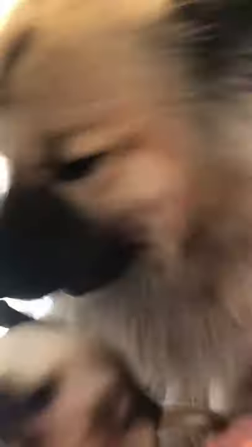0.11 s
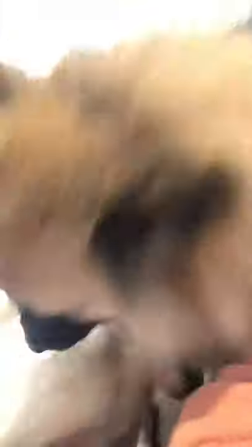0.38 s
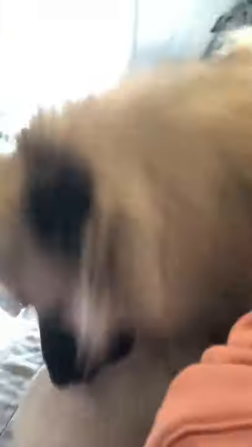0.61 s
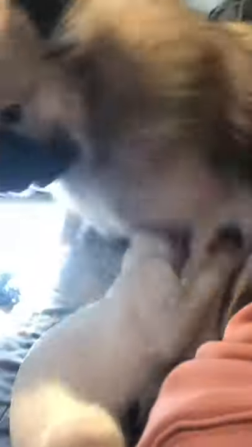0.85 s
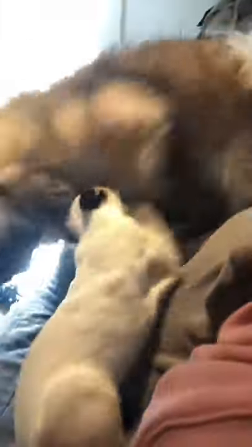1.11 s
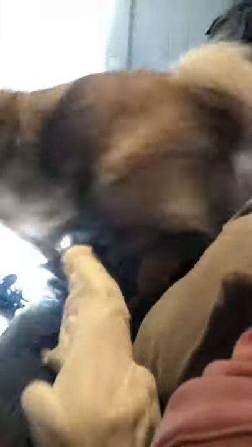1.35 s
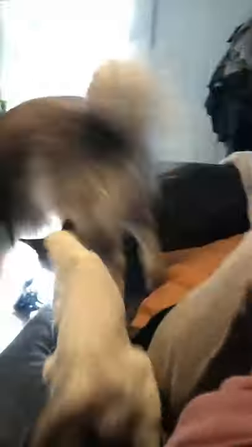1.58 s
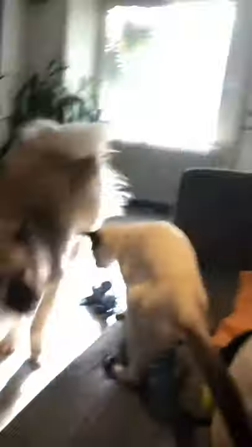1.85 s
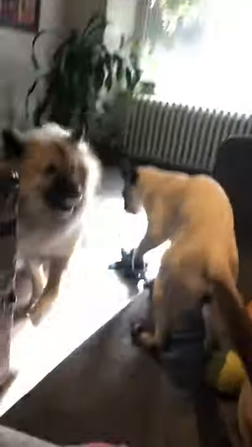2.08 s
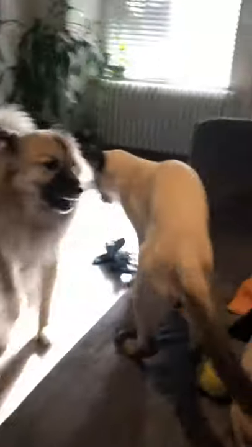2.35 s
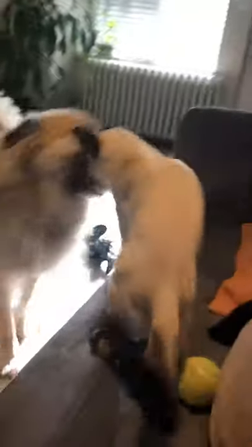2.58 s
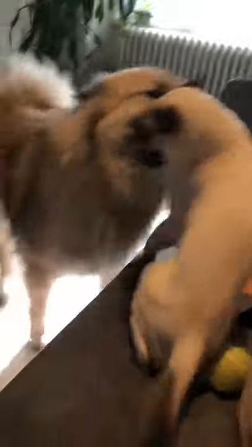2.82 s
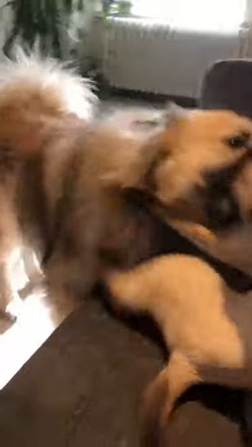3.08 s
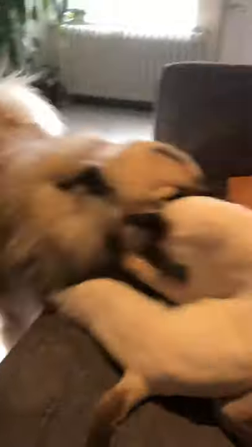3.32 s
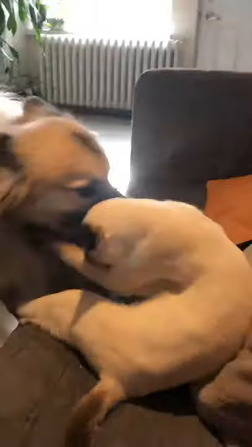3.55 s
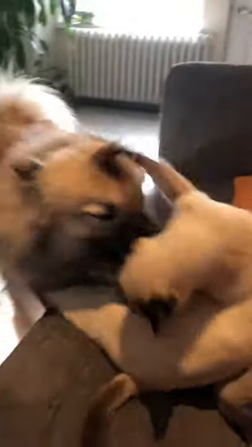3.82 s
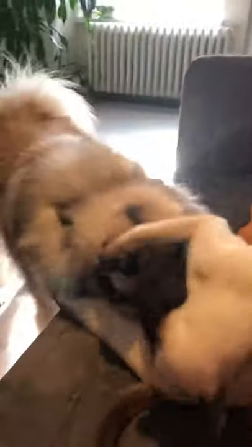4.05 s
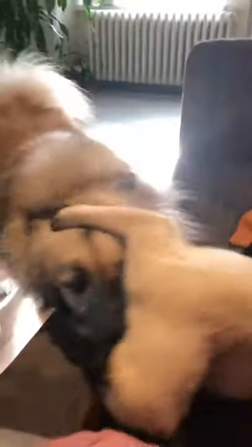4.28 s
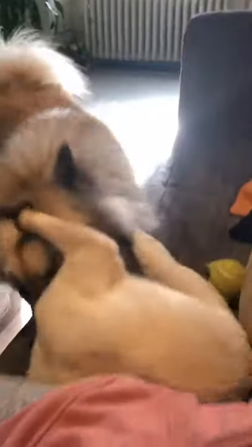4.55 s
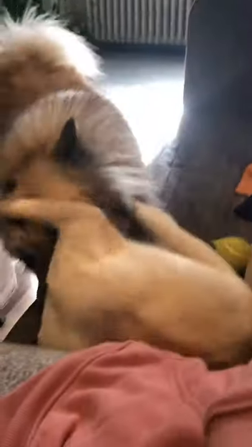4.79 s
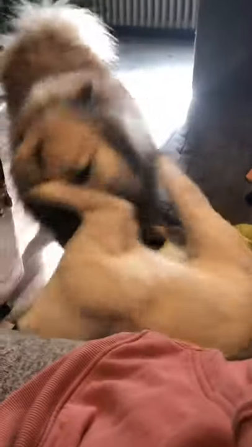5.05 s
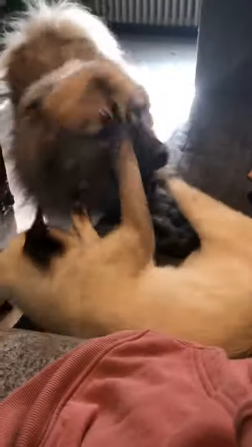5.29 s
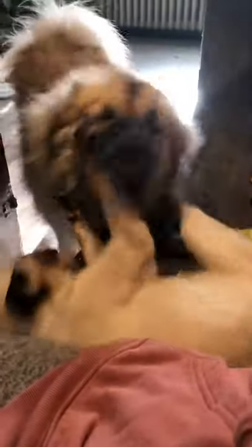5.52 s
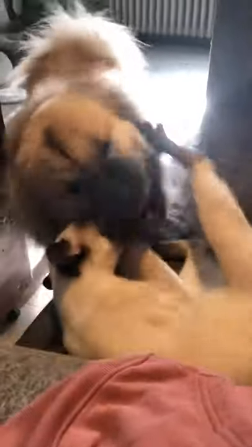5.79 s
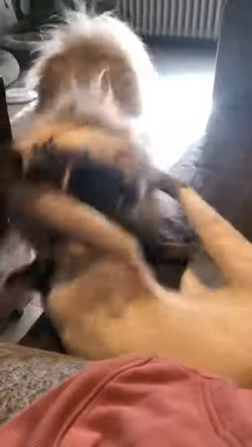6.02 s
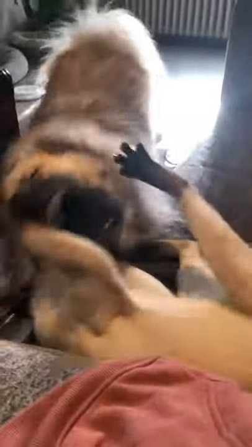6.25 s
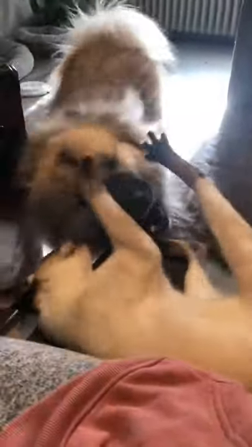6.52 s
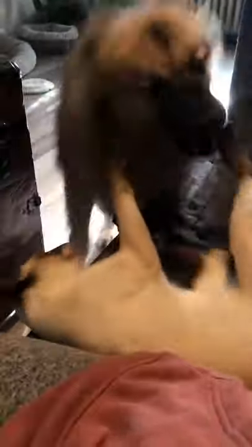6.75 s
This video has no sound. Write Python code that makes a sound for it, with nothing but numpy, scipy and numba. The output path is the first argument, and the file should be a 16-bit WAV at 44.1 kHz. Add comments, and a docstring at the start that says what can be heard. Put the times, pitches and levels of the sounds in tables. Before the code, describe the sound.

A large dog growls in rough, uneven bursts while wrestling on a couch, with dull paw thumps, claw scratches and brief pants in a living room.

```python
"""A large dog's uneven growl opens over faint low room noise, in bursts as it wrestles a cat on a couch.
Irregular slaps of its vocal folds and leaking air ring chest, mouth, tongue and throat, chopped by a flutter.
Paws thump, and a tooth or toy knocks, as soft pushes that ring two low modes; claws tick and skid on the
hard floor as short scratches and grainy noise, which also makes short hisses of breath in the late growls.
Pants are noise through mouth resonances. Feedback delays make the living room answer them all."""
import sys
import numpy as np
from scipy import signal
from scipy.fft import rfft, irfft, next_fast_len
from scipy.io import wavfile
from scipy.ndimage import uniform_filter1d
from numba import njit

SR = 44100
rng = np.random.default_rng(int(sys.argv[2]) if len(sys.argv) > 2 else 0)


def to_wav(s):
    """Save 16-bit WAV."""
    ch = np.atleast_2d(s).T  # columns
    pcm = np.round(np.clip(ch, -1, 1) * 32767)  # PCM
    wavfile.write(sys.argv[1], SR, pcm.astype(np.int16))


def boost(x):
    """Linear amplitude factor 10**(x/20) for a level x in decibels (scalar or array-like)."""
    u = np.asarray(x, float) / 20
    return 10 ** u


N = 303408


def rms_one(x):
    """Scales to rms 1."""
    return x / np.sqrt(np.mean(x ** 2) + 1e-20)


def in_time(rows):
    """Joins rows that start with a time in seconds into one curve per further column."""
    s, *columns = np.transpose(rows)
    return [np.interp(np.arange(N) / SR, s, column) for column in columns]


def smooth(x, hz):
    """One-pole low-pass."""
    r = np.exp(-2 * np.pi * hz / SR)
    return signal.lfilter([1 - r], [1, -r], x)


def band(x, low_hz, high_hz):
    """Keeps a resonance group out of its neighbours' range."""
    return signal.sosfilt(signal.butter(2, [low_hz, high_hz], "band", fs=SR, output="sos"), x)


def drift(hz):
    """Random wander, mostly slower than hz, with spread 1."""
    noise = rng.standard_normal(N + SR)
    return rms_one(smooth(smooth(noise, hz), hz)[SR:])


def evened(x, hz):
    """Divides out the level averaged over 1/hz seconds, above a small floor."""
    window = int(SR / hz)
    return x / np.sqrt(uniform_filter1d(x ** 2, window) + 0.00063 * np.mean(x ** 2))


def coloured(points):
    """Noise with a spectrum joined from (Hz, dB) points on a log-frequency axis; rms 1."""
    size = next_fast_len(N)
    hz = np.maximum(np.arange(size // 2 + 1) * SR / size, 1)
    point_hz, point_db = np.transpose(points)
    shape = boost(np.interp(np.log(hz), np.log(point_hz), point_db))
    return rms_one(irfft(rfft(rng.standard_normal(size)) * shape, size)[:N])


@njit
def moving(x, cosine, r):
    """Two-pole resonance whose centre may move; gain 1 on top."""
    y = np.zeros(len(x))
    for i in range(2, len(x)):
        y[i] = (1 - r * r) / 2 * (x[i] - x[i - 2]) + 2 * r * cosine[i] * y[i - 1] - r * r * y[i - 2]
    return y


def resonance(x, hz, width_hz):
    """Rings x at a fixed or moving frequency."""
    return moving(x, np.cos(2 * np.pi * hz / SR) * np.ones(len(x)), np.exp(-np.pi * width_hz / SR))


def tract(x, modes):
    """Parallel resonances (Hz, width Hz, dB) with alternating signs."""
    return sum((-1) ** k * boost(db) * resonance(x, hz, w) for k, (hz, w, db) in enumerate(modes))


def room_tone():
    """Steady coloured noise, strongest in the bass, whose level wanders slightly."""
    # Spectrum of the quiet room: pitch_hz, level_db (relative)
    tone_colour = [(18, -46), (30, 22), (161, 15.5), (702, 3.5), (1810, -5), (3400, -12), (4910, -15),
                   (6720, -18), (7670, -21), (8740, -21.5), (16000, -26.5)]
    tone_db = -51.5
    return boost(tone_db + 0.5 * drift(4.4)) * coloured(tone_colour)


def with_silence(bursts):
    """Chains the growls; the level falls to -90 dB between them."""
    rows = []
    for burst in bursts:
        (first_s, _, first_opening), (last_s, _, last_opening) = burst[0], burst[-1]
        rows += [(first_s - .004, -90, first_opening), *burst, (last_s + .03, -90, last_opening)]
    return rows


def fold_slaps(rate, rough):
    """Each fold cycle slaps once, uneven in time and strength; loose tissue knocks at random between."""
    knocks_per_slap, rattle_gain = 3, 2.4
    wobble = rough * (.6 * drift(80) + .3 * drift(20))
    cycle = (np.cumsum(rate * np.exp(wobble)) / SR).astype(int)
    strength = boost(rough * (8.5 * rng.standard_normal(N)[cycle] + 3.5 * drift(50)))
    knocks = (rng.random(N) < knocks_per_slap * rate / SR) * rng.standard_normal(N)
    slaps = -np.diff(cycle, prepend=0) * strength
    return rattle_gain * rough ** 1.5 * knocks + slaps + 1e-18


def leaking_air(slaps, rough):
    """Air leaks steadily through the folds and rushes through after each slap."""
    flow = rms_one(smooth(np.abs(slaps), 55.0))
    return (0.39 + 0.75 * flow) * (0.48 + 2 * rough) * rng.standard_normal(N)


def palate_flutter(rough):
    """The soft palate flaps and chops the sound, deeper when the folds are rough."""
    flutter_hz, depth_db_per_rough = 23, 8
    flap = np.sin(2 * np.pi * np.cumsum(flutter_hz * np.exp(.15 * drift(6))) / SR)
    return boost(depth_db_per_rough * rough * flap)


def throat_breath(slaps, stretch):
    """Breath noise pulses with the slaps and echoes along the throat tube."""
    # Spectrum of the breath: pitch_hz, level_db (relative)
    breath_colour = [(2240, -2), (3800, -17), (4750, 9.5), (5480, 16), (8720, 5.5), (9420, 6.5),
                     (12800, 2.5), (13800, 0.5), (16000, -5)]
    tube_hz = 612   # spacing of the high tube resonances at stretch 1
    air = coloured(breath_colour) * (.5 + rms_one(smooth(np.abs(slaps), 60)))
    n = np.arange(N)
    return sum((-.4) ** k * np.interp(n - k * SR / tube_hz / stretch, n, air) for k in range(4))


def hard_slaps(mouth_hz):
    """Single hard slaps stand out of the rattle: softened clicks ring the mouth twice over."""
    # Hard slaps of the folds: start_s, level_db (the strongest sets the peak of the whole layer)
    slap_hits = [(0.698, -22), (1.689, -35), (3.136, -31), (3.738, -24), (3.824, -20.5), (4.48, -41),
                 (4.811, -27), (5.011, -17), (5.037, -20.5), (5.067, -13), (5.105, -14), (5.165, -23),
                 (5.448, -26), (5.508, -13.5), (5.813, -21), (5.891, -13.5), (6.268, -18), (6.335, -16),
                 (6.431, -19.5), (6.498, -11), (6.637, -20)]
    soft_hz = 2200
    clicks = np.full(N, 1e-18)
    start_s, level_db = np.transpose(slap_hits)
    clicks[[round(s * SR) for s in start_s]] = boost(level_db)
    softened = smooth(smooth(clicks, soft_hz), soft_hz)
    knock = resonance(resonance(softened, mouth_hz, 260), mouth_hz, 600)
    return knock * clicks.max() / np.abs(knock).max()


def growl():
    """Uneven fold slaps, fluttered by loose throat tissue, ring chest, mouth, tongue and throat."""
    # Each growl burst: start_s, effort_db (chest level), opening_db (mouth opening setting)
    growl_bursts = [
        [(0.018, -34, -4.5), (0.028, -39.5, -5), (0.052, -34, -7), (0.13, -70, -30)],
        [(0.268, -43, 3), (0.278, -31, -19), (0.295, -29, -5), (0.312, -38, -20), (0.35, -53, -25),
         (0.37, -61, -16)],
        [(0.5, -56, -44), (0.52, -38, -3), (0.594, -38.5, -3.5), (0.616, -23.5, -7.5), (0.686, -32, -6),
         (0.708, -23, -9), (0.732, -34.5, -7), (0.978, -32, -4), (1.022, -38, -9.5), (1.054, -62, 3),
         (1.08, -62, -15)],
        [(1.16, -57, -7), (1.17, -37, -1), (1.21, -22.5, -14.5), (1.248, -30, 3.5), (1.428, -37.5, -8),
         (1.48, -57.5, -9)],
        [(1.665, -42, -11), (1.689, -30.5, 2), (1.711, -27, -3.5), (1.813, -32, -5.5), (1.833, -30.5, -0.5),
         (1.935, -42, 4.5), (1.955, -37, -8)],
        [(2.05, -53, 6), (2.164, -47.5, -0.5), (2.28, -38.5, -2.5), (2.492, -47.5, -4), (2.536, -40.5, -5),
         (2.628, -36.5, -7.5), (2.68, -59.5, 8.5)],
        [(2.96, -38, 0.5), (2.984, -33, -0.5), (3.094, -28, -4.5), (3.144, -30, -2.5), (3.28, -29.5, -10.5),
         (3.31, -35.5, -3), (3.412, -31, -12), (3.496, -42, -13), (3.522, -36.5, -14), (3.626, -40, -10),
         (3.698, -30.5, -5), (3.882, -33.5, -1.5), (3.894, -32, -7.5), (3.935, -44.5, 4)],
        [(4.475, -62, -24), (4.479, -42, 2), (4.511, -32, -4), (4.729, -34.5, -3.5), (4.923, -34, 5.5),
         (4.935, -25.5, -11), (4.951, -33, 2.5), (5.047, -35, 7), (5.081, -29, -3.5), (5.103, -32.5, 4.5),
         (5.145, -30, -5), (5.241, -33, -3.5), (5.437, -30, -5), (5.455, -27.5, 1.5), (5.631, -26, 3),
         (5.743, -31, -2), (5.857, -31.5, 3), (5.907, -25.5, -2.5), (5.98, -42, -7)],
        [(6.262, -60, 0), (6.268, -25.5, 0), (6.316, -30, 1), (6.342, -26.5, 4), (6.362, -31, -8),
         (6.508, -26.5, 4), (6.686, -29.5, 1.5), (6.738, -31, -2.5), (6.79, -33.5, 3), (6.822, -51, -5),
         (6.845, -61, -10)],
    ]
    # Voice setting: start_s, fold_rate_hz (before wobble), tongue_hz, upper_throat_hz (before wander),
    # lips_drawn (share drawn back, 0-1)
    voice = [(0, 86.1, 1100, 1680, 0.6), (.1, 80.43, 1100, 1690, 0.6), (.27, 118.1, 965, 1750, 0.38),
             (.37, 74.6, 1000, 1840, 0.1), (.5, 167.1, 930, 1610, 0.8), (.58, 135.2, 950, 1720, 0.47),
             (.68, 135.5, 970, 1500, 0.58), (.85, 137.1, 854, 1835, 0.61), (.97, 138.4, 880, 1576, 0.43),
             (1.04, 110.7, 895, 1600, 0.6), (1.16, 180.8, 1070, 1650, 0.35), (1.25, 179, 1040, 1700, 0.59),
             (1.4, 173.5, 1310, 1750, 0.57), (1.665, 135.7, 1092, 1490, 0.51),
             (1.76, 164.4, 1050, 1510, 0.59), (1.87, 154.2, 1180, 1670, 0.72),
             (1.95, 148.3, 1270, 1750, 0.79), (2.14, 89.25, 1043, 1797, 0.61),
             (2.38, 98.45, 1100, 1950, 0.59), (2.68, 95.57, 1270, 1800, 0.67),
             (2.96, 90.77, 1100, 1906, 0.26), (3.08, 140, 1210, 2160, 0.54),
             (3.16, 150.5, 1230, 2200, 0.46), (3.25, 129.8, 1225, 1758, 0.47),
             (3.42, 99.95, 1200, 1910, 0.5), (3.6, 90.26, 1110, 2132, 0.47),
             (3.74, 137.6, 1264, 2092, 0.46), (3.92, 125.2, 1430, 2320, 0.57),
             (4.475, 108.9, 1055, 1650, 0.23), (4.6, 119.5, 1355, 1720, 0.61),
             (4.78, 104.2, 1191, 1802, 0.44), (4.99, 125.4, 1100, 1871, 0.41),
             (5.13, 140.8, 1180, 2200, 0.54), (5.25, 104.9, 1032, 1900, 0.36),
             (5.41, 126.5, 1001, 1982, 0.5), (5.51, 157.2, 1100, 1840, 0.36),
             (5.68, 130.6, 1020, 1933, 0.38), (5.75, 107.1, 1043, 1905, 0.41),
             (5.84, 121.7, 1130, 2003, 0.52), (5.92, 148.7, 1190, 2200, 0.64),
             (6.26, 88.18, 1030, 2480, 0.39), (6.35, 121.9, 1100, 2382, 0.58), (6.4, 149, 1100, 1895, 0.48),
             (6.5, 149, 1131, 2010, 0.42), (6.64, 151.2, 1151, 2200, 0.59), (6.72, 125.4, 1250, 1630, 0.48),
             (6.8, 120, 1300, 1935, 0.76)]
    # Unevenness of the folds: start_s, roughness (0-1)
    roughness = [(0, .3), (1.15, .28), (1.6, .28), (1.68, .14), (1.8, .17), (1.9, .24), (2.1, .25),
                 (2.9, .25), (2.97, .18), (3.05, .26), (3.3, .3), (3.4, .3), (4.6, .3), (5.12, .3),
                 (5.2, .17), (5.3, .12), (5.47, .2), (5.7, .2), (5.85, .2), (5.95, .13), (6.26, .1),
                 (6.32, .16), (6.36, .26), (6.5, .32), (6.7, .3), (6.78, .15)]
    # Throat shape as jaw and head move: start_s, fourth_hz, fourth_db, fifth_hz, fifth_db
    # (levels against the upper throat resonance, before they wander)
    high_throat = [(0, 2530, -12, 3320, -2), (.55, 2290, -7, 3130, -18), (.65, 2330, -7, 3070, -17),
                   (.75, 2320, -1, 3120, -2), (.85, 2390, -14, 3400, -23), (.97, 2250, -4, 3310, -13),
                   (1.2, 2560, -1, 3120, -5), (1.42, 2399, -4, 3170, -12), (1.7, 2150, -3, 3430, -6),
                   (1.92, 2270, -5, 3550, -4), (2.3, 2601, -2, 3240, -5), (2.6, 2504, -7.5, 3620, -17),
                   (3, 2398, -9, 3350, -2), (3.1, 2510, -3, 3570, -11), (3.4, 2620, 5.5, 3780, -8),
                   (3.55, 2699, -10, 3450, -16), (3.7, 2816, -6, 3550, -10), (3.8, 3003, -3, 3400, -2),
                   (3.9, 2670, -1, 3550, 2), (4.5, 2509, -11, 3650, -4.5), (4.9, 2429, 0.5, 3180, -10),
                   (5.12, 2359, 7.5, 2913, 0), (5.25, 2552, -16, 3720, -2), (5.4, 2583, -18, 3400, -8),
                   (5.55, 2694, -5, 3220, -2), (5.66, 2800, -8, 3850, -11), (5.76, 2698, -23, 3950, -13),
                   (5.83, 2770, -8, 3202, -6), (5.9, 2399, 4, 3443, 2), (6.27, 2899, 5, 3620, 1),
                   (6.35, 2800, -9, 3400, -11), (6.42, 2699, -2, 3400, -13), (6.5, 2351, -8, 3390, -7),
                   (6.75, 2450, -15, 3400, -18), (6.79, 2790, 1.5, 3800, -13)]
    # Low throat: start_s, fold_tone_db, under_mouth_db (resonance below the mouth's), mouth_length (share)
    low_throat = [(0, 7, 7, 0.93), (.3, -11, 1, 0.86), (.55, 8, -12, 0.86), (.75, -9, 7, 1.26),
                  (.95, -9, -15, 0.95), (1.2, -19, 8, 1.1), (1.35, 4, 4, 0.98), (1.72, -25, 1, 1.22),
                  (1.9, 8, -4.5, 1.01), (2.3, -5, -7, 1), (2.6, 7, -4.5, 0.87), (3, -8, 8.5, 1.06),
                  (3.2, -11, -1, 1.11), (3.4, -3, 4, 1.23), (3.55, 2, -32, 1.045), (3.7, -3, -2.5, 1.17),
                  (3.88, -11.5, -5, 1.11), (4.55, 1, 1, 0.979), (4.95, -8, -2, 0.97), (5.3, -5, -4, 0.94),
                  (5.5, -11, 0.5, 0.95), (5.9, -1, -1, 0.97), (6.28, -2, -7.5, 1.015), (6.5, -9, -6.5, 0.9),
                  (6.7, -26, 2.5, 0.93), (6.79, -35, -14, 0.77)]
    # Lasting resonances: pitch_hz, width_hz, level_db; the first, under the mouth, shifts with the pharynx
    throat_modes = [(486.6, 129, -8.5), (4310, 510, -14)]
    # Groups against the effort: level_db at mid opening and lips, opening_share, lips_db per unit of lips
    mouth_gain, tongue_gain, upper_gain = (-9, 1.14, -10.5), (-14, 0.92, 10), (-18, 0.75, 37)
    mid_opening_db = -6
    pharynx_mid_hz, pharynx_share = 220.6, 0.59   # at a 140 Hz fold rate; share of its change followed
    mouth_mid_hz, mouth_hz_per_db = 821, -0.5   # at mid opening and mouth length 1

    chest_db, opening = in_time(with_silence(growl_bursts))
    rate, tongue_hz, third_hz, lips = in_time(voice)
    rough, = in_time(roughness)
    fourth_hz, fourth_db, fifth_hz, fifth_db = in_time(high_throat)
    tone_db, under_db, mouth_length = in_time(low_throat)
    opening = np.clip(opening - mid_opening_db, -20, 20)
    lips = lips - .5
    mouth_db, tongue_db, upper_db = (chest_db + db + share * opening + per_lips * lips
                                     for db, share, per_lips in (mouth_gain, tongue_gain, upper_gain))
    breath_db = -12.5 - 8 * lips + 0.84 * (chest_db + 29.0)   # harder growls push out more air
    pharynx_hz = pharynx_mid_hz + pharynx_share * (rate - 140)
    mouth_hz = (mouth_mid_hz + mouth_hz_per_db * opening) / mouth_length

    slaps = fold_slaps(rate, rough)
    puff = leaking_air(slaps, rough)
    soft = rms_one(smooth(smooth(slaps, 1300), 1300))   # wet folds close softly
    low_source = soft + 5 * rough * smooth(puff, 1500)
    high_source = rms_one(smooth(soft, 2700)) + 1.95 * smooth(puff, 1000)

    fold_tone = resonance(low_source, rate, 90) + 3.2 * rough * resonance(low_source, 0.68 * rate, 50)
    pharynx = (1.22 - 3.5 * rough) * resonance(low_source, pharynx_hz, 55)   # even slaps ring it more
    chest = boost(tone_db) * fold_tone + pharynx

    under_hz, under_width, under_level = throat_modes[0]
    under_hz = under_hz * pharynx_hz / pharynx_mid_hz
    under_level = under_level + under_db + 0.34 * opening
    mouth = resonance(low_source, mouth_hz, 91) - tract(low_source, [(under_hz, under_width, under_level)])
    tongue_source = low_source + 1.34 * smooth(puff, 1600)
    tongue = resonance(resonance(tongue_source, tongue_hz, 270), tongue_hz, 270)

    between_hz = fourth_hz + 0.29 * (fifth_hz - fourth_hz)
    modes = [(third_hz * boost(0.34 * drift(30)), 210, -1), (fourth_hz, 120, fourth_db),
             (between_hz, 110, (fourth_db + fifth_db) / 2 - 1.5), (fifth_hz, 170, fifth_db)]
    modes += [(hz, w, db - 12 * lips) for hz, w, db in throat_modes[1:]]
    # each resonance's level wanders at random by a few dB
    upper = tract(high_source, [(hz, w, db + 3.2 * drift(18)) for hz, w, db in modes])
    breath = throat_breath(slaps, fifth_hz / np.mean(fifth_hz))   # the whole tube shortens and lengthens

    low_voice = boost(chest_db) * evened(band(chest, 63, 280.0), 22.6)
    mouth_voice = boost(mouth_db) * evened(band(mouth, 110, 693), 24.3)
    tongue_voice = boost(tongue_db) * evened(tongue, 7.7)
    upper_voice = evened(band(upper, 2080, 12500), 8.3) + boost(breath_db) * evened(breath, 4.0)
    voiced = low_voice + mouth_voice + tongue_voice + boost(upper_db) * upper_voice
    return hard_slaps(mouth_hz) + palate_flutter(rough) * voiced


def thumps_and_knock():
    """A soft push sets two low modes ringing, with a dull puff, for each landing and the knock."""
    # Paws and bodies landing, and a knock of tooth or toy near 1.6 s (rows 1.575 and 1.596):
    # start_s, level_db, pitch_hz (once settled), rise_s, t60_s
    low_hits = [(.197, -23.5, 329, 0.0015, 0.02), (.451, -50, 423, .001, 0.027),
                (1.443, -31, 52.3, 0.011, 0.2), (1.575, -34.5, 470, 0.0009, 0.026),
                (1.596, -27.5, 465, 0.0017, 0.034), (1.622, -14, 294, 0.0056, 0.027),
                (1.629, -17.5, 267, 0.0091, 0.11), (1.69, -19.5, 250, .002, 0.18),
                (1.962, -24, 281, 0.0033, 0.086), (1.984, -16, 230, 0.0092, 0.065),
                (1.995, -12.5, 255, 0.0083, 0.039), (2.02, -27, 301, 0.016, 0.17),
                (2.718, -23.5, 228, 0.0018, 0.037), (2.798, -35, 301.5, 0.0013, 0.063),
                (2.842, -32.5, 58.6, 0.0055, 0.26), (4.012, -35.5, 309, 0.0012, 0.099),
                (4.037, -28, 458, 0.0016, 0.03), (4.088, -44, 540, 0.0013, 0.039),
                (4.132, -44, 550, 0.00062, 0.029), (4.359, -37.5, 400.4, 0.00096, 0.026)]
    settle_s = .025
    out, t = np.zeros(N + SR), np.arange(SR // 2) / SR
    puff = rms_one(smooth(smooth(rng.standard_normal(N + SR), 680), 680))
    for s, level_db, hz, rise, t60 in low_hits:
        at = round(s * SR)
        # starts 35 % sharp and sags
        phase = 2 * np.pi * hz * (t + .35 * settle_s * (1 - np.exp(-t / settle_s)))
        ring = np.sin(phase) + .5 * np.sin(1.37 * phase)
        swell = (1 - np.exp(-t / rise)) * boost(-60 * t / t60)
        out[at:at + len(t)] += boost(level_db) * swell * (ring + 0.41 * puff[at:at + len(t)])
    return out[:N]


def claws_and_hisses():
    """A sharp tick, then grainy noise that swells in a few ms and dies: a skid or a short hiss."""
    # Claws on the floor, the tick of the tooth or toy knock (1.5948), and short hisses of breath
    # within the late growls (5.111, 6.6185):
    # start_s, tick_db (drive of the scratch), pitch_hz, noise_db, noise_t60_s
    bright_hits = [(0.2203, -46, 3790, -74, 0.37), (.496, -46, 5373, -73, 0.051),
                   (0.601, -25.5, 5365, -35, 0.055), (0.899, -34, 6760, -59, 0.43),
                   (1.273, -39, 5654, -47, 0.47), (1.559, -42, 3557, -62, 0.19),
                   (1.5948, -30.5, 1263, -68, 0.037), (1.6211, -20.5, 10830, -33, 0.039),
                   (1.6325, -28, 9300, -45, 0.4), (1.961, -35, 5470, -43, 0.13),
                   (1.9787, -8, 8250, -41, 0.54), (2.205, -40, 4727, -47.5, 0.4),
                   (2.6286, -35, 3720, -47, 0.25), (2.803, -31, 4920, -46.5, 0.29),
                   (2.8977, -37, 4320, -56.5, 0.47), (2.928, -39, 5202, -43.5, 0.54),
                   (2.9565, -23, 7060, -39.5, 0.15), (3.0574, -27, 4950, -35.5, 0.11),
                   (3.1758, -36, 4737, -45, 0.097), (4.016, -44, 2800, -68, 0.054),
                   (4.039, -31.5, 3056, -64, 0.072), (4.0897, -41, 3400, -77, 0.27),
                   (4.1338, -39.5, 3300, -80, .2), (4.313, -47, 3156, -79, .08),
                   (4.36, -45, 2954, -84, 0.17), (5.111, -33, 3538, -58, 0.075),
                   (5.7474, -38, 3983, -41.5, 0.086), (6.6185, -27, 4082, -37, 0.17)]
    # Spectrum of the grainy noise: pitch_hz, level_db (relative)
    grain_colour = [(880, -48), (1500, 16), (2800, 10), (3590, 13.5), (4500, 9), (5490, 12.5), (7460, 10),
                    (16000, -2)]
    out, t = np.zeros(N + SR), np.arange(SR // 2) / SR
    grain = coloured(grain_colour) * boost(4.0 * drift(315))
    for s, tick_db, hz, noise_db, t60 in bright_hits:
        at = round(s * SR)
        scratch = rng.standard_normal(len(t)) * np.exp(-t * hz / 11)   # longer for dull ticks
        tick = resonance(resonance(scratch, hz, hz), hz, hz)
        envelope = (1 - np.exp(-t / .006)) * boost(-60 * t / t60)
        piece = np.resize(grain[at:at + len(t)], len(t))
        piece = piece + 0.25 * resonance(piece, hz, 5400)   # the noise keeps the colour of its tick
        out[at:at + len(t)] += boost(tick_db) * tick + boost(noise_db) * envelope * piece
    return out[:N]


def pant():
    """Turbulent air through the open mouth; each pant swells, holds and stops."""
    # Pants: start_s, swell_s, hold_s, level_db, upper_db (upper resonances against the low ones)
    pants = [(2.658, 0.045, 0.06, -47.5, -6.5), (5.962, 0.088, 0.025, -34, 0.5),
             (6.076, 0.015, 0.039, -35.5, -13), (6.134, 0.062, 0.027, -48, -9),
             (6.83, 0.032, .02, -59, -15)]
    # Resonances of the panting mouth: pitch_hz, width_hz, level_db (relative)
    pant_modes = [(1100, 310, 0.5), (1300, 430, -4), (2670, 350, -6.5), (3400, 320, -6.5),
                  (7560, 4700, -26), (600, 580, -13.5)]
    release_s = 0.012
    t = np.arange(N) / SR
    air = rng.standard_normal(N) * boost(1.9 * drift(70.8))
    upper_modes = [m for m in pant_modes if 2000 < m[0] < 5000]
    other_modes = [m for m in pant_modes if not 2000 < m[0] < 5000]
    low, high = tract(air, other_modes), tract(air, upper_modes)
    out = np.zeros(N)
    for s, swell, hold, level_db, upper_db in pants:
        release = np.exp(-np.maximum(t - s - swell - hold, 0) / release_s)
        shape = np.clip((t - s) / swell, 0, 1) * release
        out += boost(level_db) * shape * (low + boost(upper_db) * high)
    return out / low.std()


def room(x):
    """Feedback delays of unrelated lengths, slightly duller on every round, evaluated in frequency."""
    bass_t60_s, wall_cut_hz = 0.26, 150000   # decay time halves at the cut
    size = next_fast_len(N + SR)
    hz = np.arange(size // 2 + 1) * SR / size
    t60 = bass_t60_s / (1 + hz / wall_cut_hz)
    response = 0
    for k, lag_s in enumerate(np.geomspace(.009, .047, num=22)):
        loop = boost(-60 * lag_s / t60) * np.exp(-2j * np.pi * hz * lag_s)
        response = response + (-1) ** k * loop / (1 - loop)
    return irfft(rfft(x, size) * response, size)[:N]


def scene():
    """Growls, thumps, a knock, claws, hisses and pants in the room, over the room tone."""
    room_db = -19.5   # gain on the summed delays
    near = growl() + thumps_and_knock() + claws_and_hisses() + pant()
    return (near + boost(room_db) * room(near) + room_tone())[None]


def low_pass(x):
    """Removes everything above the highest recorded frequency."""
    return signal.sosfilt(signal.butter(12, 16800, fs=SR, output="sos"), x)


def record(dry):
    """A small microphone loses the deep bass; the highest peaks are rounded."""
    mic_low_hz, limit = 74, .42   # limit is the full-scale share that peaks approach
    x = signal.sosfilt(signal.butter(3, mic_low_hz, "high", fs=SR, output="sos"), dry)
    rounded = limit * np.tanh(x / limit)
    return low_pass(rounded)


dry = scene()
out = record(dry)
to_wav(out)
```